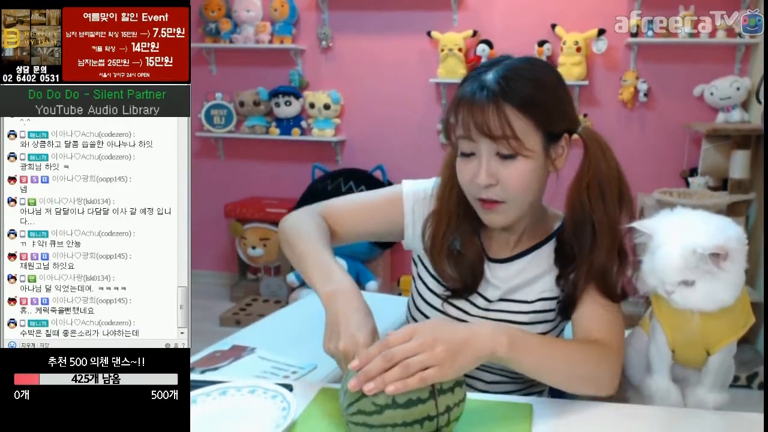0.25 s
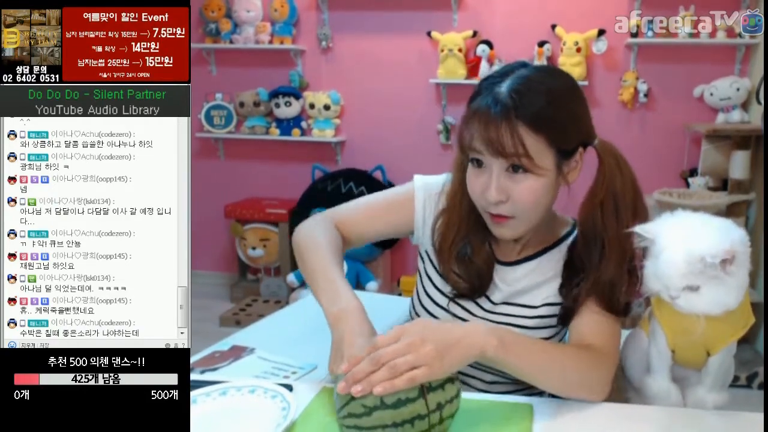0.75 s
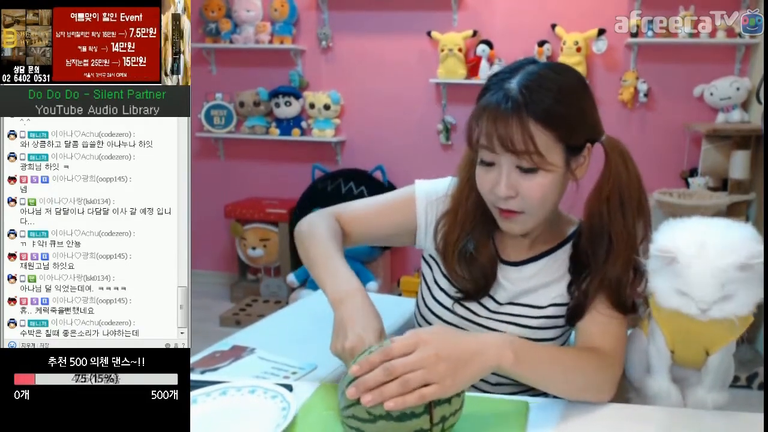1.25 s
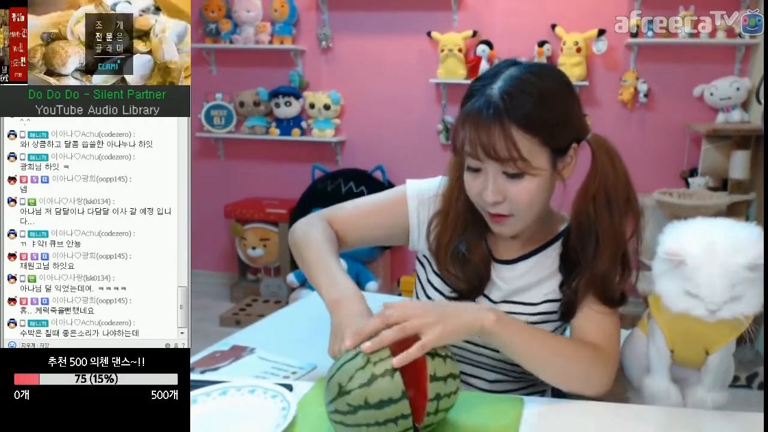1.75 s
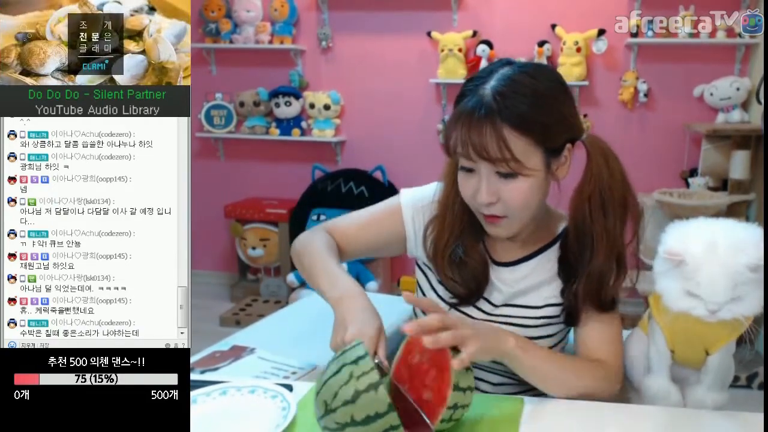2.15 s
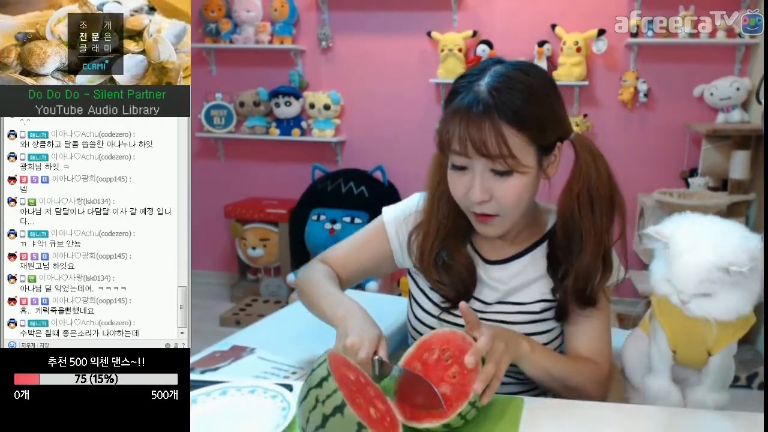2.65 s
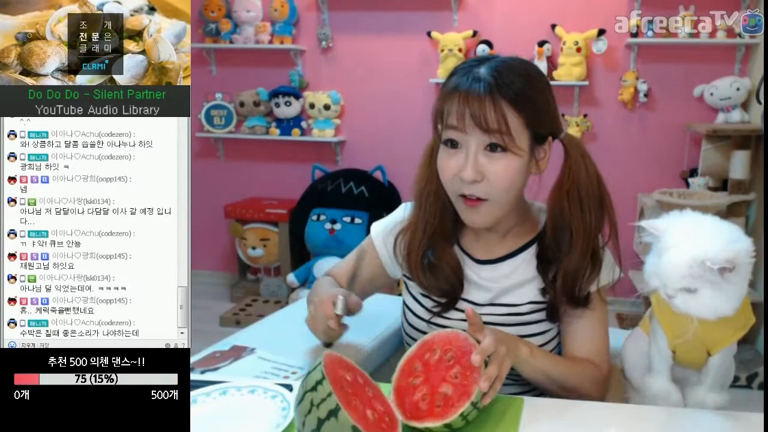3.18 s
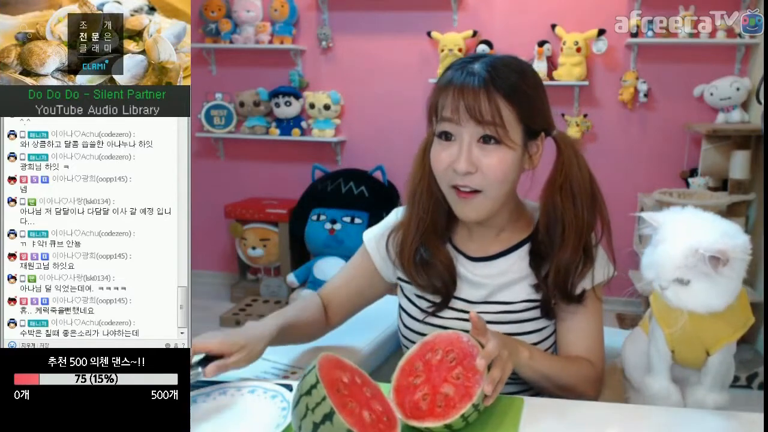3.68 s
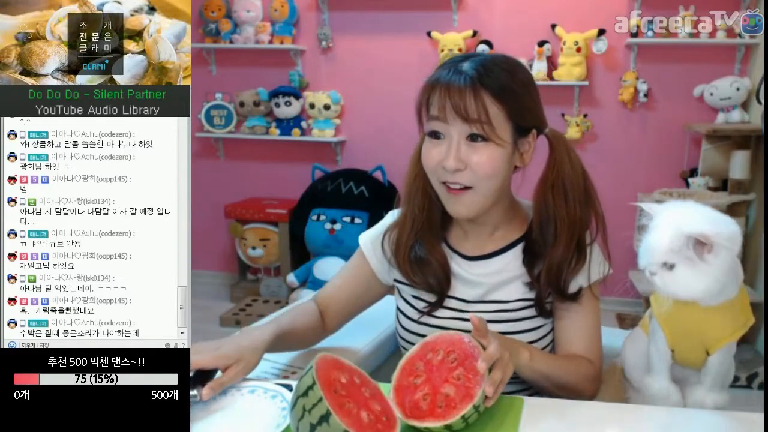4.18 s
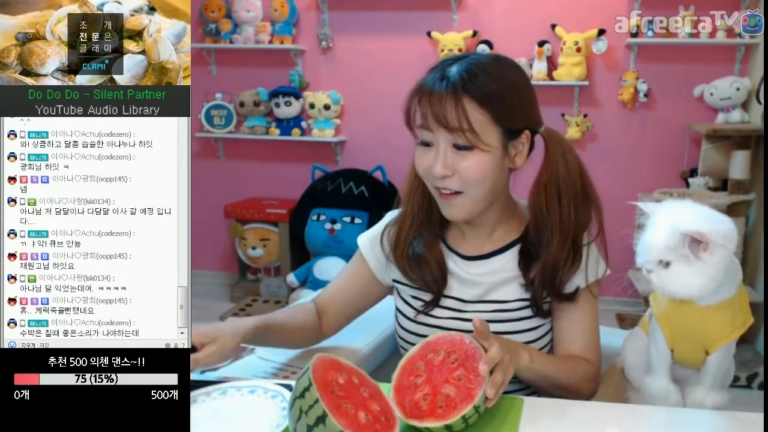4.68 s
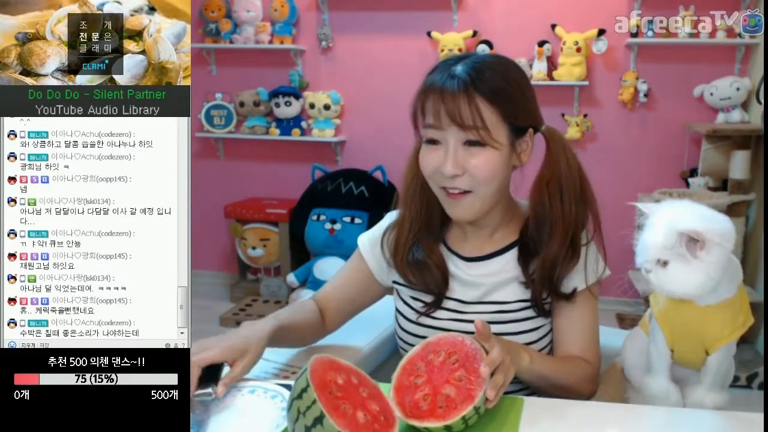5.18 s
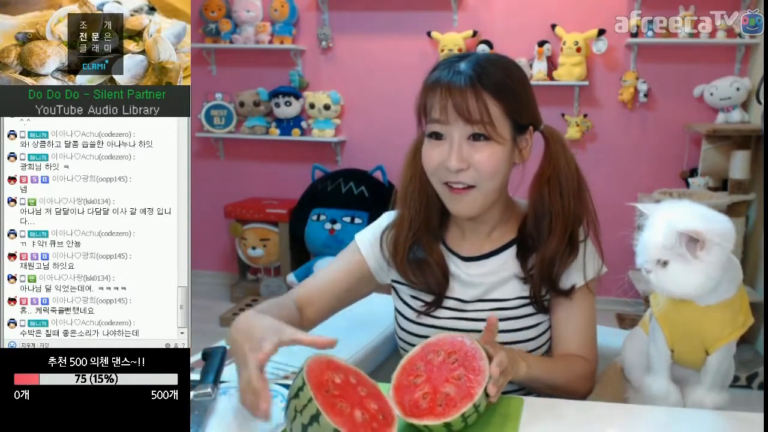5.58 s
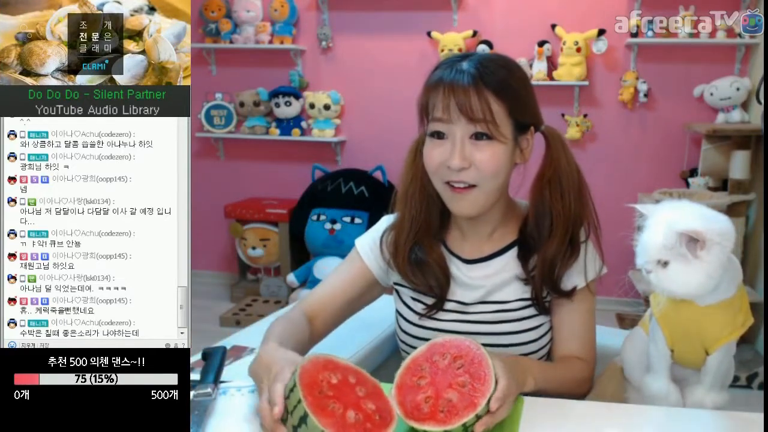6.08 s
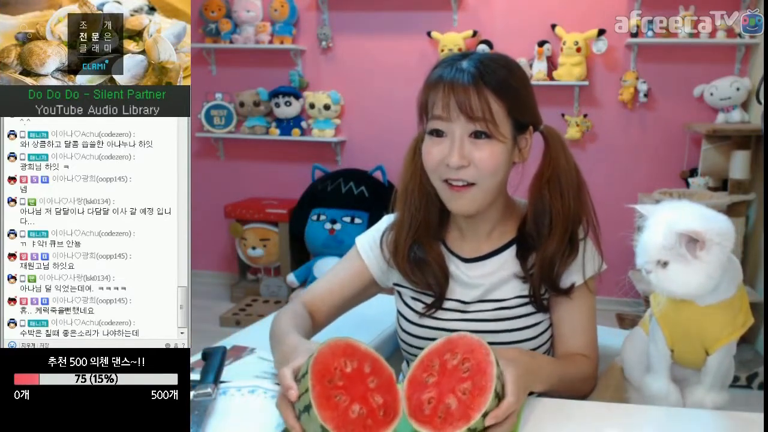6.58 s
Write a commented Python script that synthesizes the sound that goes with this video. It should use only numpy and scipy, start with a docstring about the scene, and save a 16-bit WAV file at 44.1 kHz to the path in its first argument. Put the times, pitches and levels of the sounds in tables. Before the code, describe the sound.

A knife cracks and crunches through a watermelon, knocks on the board, wet flesh tears apart, then a blade clatters brightly onto a dish indoors.

```python
"""Cutting a watermelon

A kitchen knife is pushed through a watermelon on a board in a small room, close to one microphone.
Rind and flesh crack as short clicks that shake the hollow melon; fibres tear as a dense crackle of tiny snaps.
The blade knocks on the board as bursts of fading noise; laid against a dish, it rings as a set of fading tones.
The handle bumps the table before the blade drops on the dish; last, the halves slide as soft noise.
Under it all the table booms and rumbles, and a fan hums in the air.
"""
import sys
import numpy as np
from scipy import signal
from scipy.fft import rfft, irfft
from scipy.io import wavfile
from scipy.ndimage import uniform_filter1d

SR = 44100
rng = np.random.default_rng(int(sys.argv[2]) if len(sys.argv) > 2 else 0)


def unload_audio(sound):
    """Save the sound as a 16-bit wav file, at the path given as the first command line argument."""
    columns = np.transpose(np.atleast_2d(sound))
    # keep every value between -1 and 1, then stretch to whole-number steps
    steps = np.round(np.clip(columns, -1, 1) * 32767)
    wavfile.write(sys.argv[1], SR, steps.astype(np.int16))


N = 301100
TIME = np.arange(N) / SR  # seconds

# Tone colour of the hollow, whole melon. Each row: frequency in Hz, relative level in dB.
MELON = [(30, -26), (130, -13), (230, -6), (310, -10), (380, 2), (480, 4), (590, -7), (800, -16),
         (1220, -10), (1700, -15), (2400, -14), (5000, -34)]


def from_db(db):
    """Turn decibels into a plain factor."""
    return 10 ** (np.asarray(db) / 20)


def rms_one(x):
    """Scale a sound to an average (rms) level of 1."""
    return x / np.sqrt(np.mean(x ** 2) + 1e-20)


def convolve(x, response):
    """Let every sample of x set off the response, kept to the scene's length."""
    return signal.fftconvolve(x, response)[:N]


def clicks(times, heights):
    """One-sample impulses at the given seconds."""
    samples = np.round(np.asarray(times) * SR).astype(int)
    return np.bincount(samples, heights, N)[:N]


def pulse(spectrum, size=4096):
    """The most abrupt causal pulse that has this spectrum (minimum phase); peak 1."""
    hz, db = np.transpose(spectrum)
    grid = np.maximum(np.fft.rfftfreq(size, 1 / SR), 1)
    grid_db = np.interp(np.log(grid), np.log(hz), db)
    cepstrum = irfft(np.log(from_db(grid_db)))
    cepstrum[0] = 0
    # doubling the first half of the cepstrum moves the energy as early as possible
    shape = irfft(np.exp(rfft(2 * cepstrum[:size // 2], size)))
    return shape / np.abs(shape).max()


def noise(spectrum):
    """Coloured noise of rms 1."""
    return rms_one(convolve(rng.standard_normal(N), pulse(spectrum)))


def ring(x, hz, t60):
    """A unit click sets a sine of height 1 ringing; it falls by 60 dB in t60 seconds."""
    radius = from_db(-60 / (t60 * SR))
    angle = 2 * np.pi * hz / SR
    return signal.lfilter([0, np.sin(angle)], [1, -2 * radius * np.cos(angle), radius ** 2], x + 1e-18)


def dying(t60):
    """One second of exponential decay, 60 dB in t60 seconds."""
    return from_db(-60 * TIME[:SR] / t60)


def colourless(response, size=140):
    """Even out the broad humps of a one-second response, so that it only spreads sound in time; unit energy."""
    power = np.abs(rfft(response, SR)) ** 2
    for _ in range(2):
        power = uniform_filter1d(power, size)  # size in Hz
    inverse_db = -10 * np.log10(power + 1e-9)
    inverse = pulse(np.column_stack([np.arange(len(power)) + 1, inverse_db]))
    even = signal.fftconvolve(response, inverse)[:SR]
    return even / np.linalg.norm(even)


def dense_ring(t60):
    """Countless overlapping modes: noise that dies away; unit energy."""
    return colourless(rng.standard_normal(SR) * dying(t60))


def softened(x, hard_hz):
    """A softer contact loses its treble, above a lower cutoff."""
    return signal.sosfilt(signal.butter(1, min(hard_hz, .45 * SR), fs=SR, output="sos"), x)


def struck(modes, s, db, hard_hz):
    """Blows set separate tones ringing; harder contacts wake the higher ones."""
    total = np.zeros(N)
    for hz, mode_db, t60 in modes:
        heights = from_db(db + mode_db) / np.hypot(1, hz / hard_hz)
        total += ring(clicks(s, heights), hz, t60) * rng.choice([-1, 1])
    return total


def efforts(rows, attack_db_per_s, release_db_per_s):
    """Level in dB over time: each effort sets in, changes steadily to its final level, then lets go."""
    levels = []
    for s, length, db, build_db in rows:
        build = build_db * np.clip(1 - (TIME - s) / length, 0, 1)
        attack = attack_db_per_s * np.maximum(s - TIME, 0)
        release = release_db_per_s * np.maximum(TIME - s - length, 0)
        levels.append(db - build - attack - release)
    return np.max(levels, axis=0)


def room(x, wet_db, build_s=.009):
    """Direct sound, three close reflections and a diffuse tail that builds up and dies band by band."""
    # Reflections from board, table and nearby things. Each row: delay in seconds, level in dB.
    echoes = [(.0014, -9), (.0036, -16), (.0087, -13)]
    # The tail of the room. Each row: frequency in Hz, relative level in dB, time to fall 60 dB in seconds.
    tail_bands = [(100.3, 0, 0.459), (396, -4.5, 0.32), (1190, 6.5, .32), (3486, 3, 0.3), (7050, 0, 0.34),
                  (10100, 6.5, .25)]
    delays, echo_db = np.transpose(echoes)
    near = clicks(np.append(0, delays), np.append(1, from_db(echo_db)))[:SR]
    hz, db, t60 = np.transpose(tail_bands)
    white = rfft(rng.standard_normal(SR))
    grid = np.log(np.arange(SR // 2 + 1) + 1)
    tail = np.zeros(SR)
    for share, band_db, band_t60 in zip(np.eye(len(hz)), db, t60):
        # each band fades over into its neighbours
        band = irfft(white * np.interp(grid, np.log(hz), share), SR)
        tail += band * from_db(band_db) * dying(band_t60)
    tail *= 1 - np.exp(-(TIME[:SR] / build_s) ** 2)
    return convolve(x, colourless(near + from_db(wet_db) * tail / np.linalg.norm(tail)))


def room_tone():
    """Steady air noise with the soft resonances of a fan, which are noise through narrow filters."""
    # Colour of the air noise. Each row: frequency in Hz, relative level in dB.
    air_colour = [(15, -53), (25, -19.5), (65, -2), (118, -2), (141, -13.5), (168, -7), (375, -8.5),
                  (404, -21.5), (447, -15.5), (737, -21), (857, -12.5), (924, -26.5), (996, -11.5),
                  (2580, -24.5), (10000, -39), (13000, -61.5), (22000, -120)]
    # Fan resonances. Each row: frequency in Hz, width in Hz, level in dB.
    fan_hums = [(79.4, 16, -73), (438.2, 34, -74.5), (842, 80, -73), (969, 19, -82.5)]
    fan = np.zeros(N)
    for hz, width, db in fan_hums:
        t60 = np.log(1000) / (np.pi * width)  # a wide resonance dies sooner
        fan += from_db(db) * rms_one(ring(rng.standard_normal(N), hz, t60))
    return from_db(-65) * noise(air_colour) + fan


def sway():
    """Leaning on the knife slowly rocks the table and the microphone on it."""
    # Each row: start in seconds, level in dB before the low-pass filter.
    leans = [(0, -41.5), (0.639, -40.5), (1.721, -55)]
    s, db = np.transpose(leans)
    rocking = ring(clicks(s, from_db(db)), hz=17, t60=1.1)
    return signal.sosfilt(signal.butter(2, 35, fs=SR, output="sos"), rocking)


def table():
    """The table top booms under each shove and rumbles as the melon rocks."""
    # Shoves that set the table booming. Each row: time in seconds, level in dB before the mode's own level.
    shoves = [(0.569, -47), (0.637, -49.5), (0.904, -51), (.955, -46), (1.026, -41.5), (1.354, -54.5),
              (5.349, -42), (5.552, -60)]
    # Table tones. Each row: frequency in Hz, relative level in dB, time to fall 60 dB in seconds.
    table_modes = [(62.6, -2, 0.4), (87.3, -2, 0.36), (124, -5, 0.21), (172, 0.5, .14), (222, -5, 0.24)]
    # The melon rocks and rubs on the board.
    # Each row: start in seconds, length in seconds, final level in dB, build-up in dB.
    rocks = [(.54, 0.042, -58, 0), (.72, 0.24, -51.5, 14), (.96, 0.054, -52.5, 5), (1.38, .1, -60.5, 3),
             (1.72, 0.33, -69, 3), (2.25, 0.29, -69, 2), (5.55, 0.059, -60, 4)]
    # Colour of the rumble. Each row: frequency in Hz, relative level in dB.
    rumble_colour = [(20, -15), (45, -11.5), (90, -2), (200, -2.5), (300, -8), (450, -7), (700, -12.5),
                     (1400, -16.5), (4000, -42)]
    holding_db = -77  # faint rumble of hands and arms on the table
    s, db = np.transpose(shoves)
    boom = sum(ring(clicks(s, from_db(db + mode_db)), hz, t60) for hz, mode_db, t60 in table_modes)
    boom = signal.sosfilt(signal.butter(4, 62, "high", fs=SR, output="sos"), boom)
    rocking = from_db(efforts(rocks, attack_db_per_s=301, release_db_per_s=138))
    return boom + np.hypot(rocking, from_db(holding_db)) * noise(rumble_colour)


def sliding():
    """Wet rind hisses softly over the board: noise that swells with each slide."""
    # Each row: start in seconds, length in seconds, final level in dB, build-up in dB.
    slides = [(5.9, 0.13, -76, 8), (6.27, .15, -67, 12), (6.75, .07, -76.5, 5)]
    # Colour of the hiss. Each row: frequency in Hz, relative level in dB.
    slide_colour = [(500, -13), (1300, -2.5), (2500, -1), (5300, -0.5), (7000, -7.5), (10000, -22)]
    level_db = efforts(slides, attack_db_per_s=101, release_db_per_s=47)
    return from_db(level_db) * noise(slide_colour)


def handle():
    """The handle bumps the table: a short woody thud, with a faint ring of the steel after it."""
    # The bump: time in seconds, level in dB before the gains of thud and ring.
    bump = (4.6368, -34.5)
    # Colour of the thud. Each row: frequency in Hz, relative level in dB.
    bump_colour = [(100, -15), (400, -8), (700, -5), (1700, -7), (2500, -9), (3500, -19.5), (5000, -16.5),
                   (7000, -23), (10000, -31.5)]
    # Tones of the handle. Each row: frequency in Hz, relative level in dB, time to fall 60 dB in seconds.
    handle_modes = [(493, -13, .05), (688, -8.5, 0.11), (890, -23, 0.049), (1040, -5, 0.045),
                    (1730, -7.5, 0.036), (2430, -12, 0.051), (4740, -24, 0.36)]
    s, db = bump
    hit = clicks([s], [from_db(db)])
    thud = convolve(convolve(hit, pulse(bump_colour)), dense_ring(t60=.05))
    steel_ring = sum(from_db(mode_db) * ring(hit, hz, t60) for hz, mode_db, t60 in handle_modes)
    return from_db(9.5) * thud + from_db(-3.5) * steel_ring


def knife():
    """The blade touches lightly three times, then drops on the dish and bounces; tones ring and contacts tick."""
    # Each row: time in seconds, then levels in dB (before their gains below) of blade ring, dish ring
    # and contact tick, and hardness as a treble cutoff in Hz.
    clinks = [(4.0378, -61.5, -90.5, -61, 9100), (4.4098, -41.5, -62, -40.5, 1600),
              (5.2912, -55.5, -79.5, -64, 12100), (5.3474, -41, -18.5, -10, 12000),
              (5.3560, -48, -25.5, -18.5, 4955), (5.3600, -42.5, -23, -17, 12000),
              (5.3665, -44.5, -33, -15, 9000)]
    # Tones of the steel blade. Each row: frequency in Hz, relative level in dB, time to fall 60 dB in seconds.
    blade_modes = [(797, -2, .16), (1040, -10, .1), (1448, -9, .1), (1700, -11, .08), (2207, -3, .18),
                   (2304, -5, .12), (3110, -5, .12), (3381, -9, .12), (4240, -4, .13), (5599, -10, .12),
                   (7080, -10, .11)]
    # Tones of the dish. Each row: frequency in Hz, relative level in dB, time to fall 60 dB in seconds.
    dish_modes = [(1360, -17, .08), (1995, -5.5, .09), (2126, -13, .12), (3626, -9, .13), (3912, -12, .1),
                  (4479, -18, .14), (5399, -16, .14), (5771, -15, .12), (6045, -10, .1), (6208, -11, .12),
                  (6364, -13, .14), (6938, -7, .13), (7035, -3, .17), (7109, -6, .13), (7239, -6, .14),
                  (7346, -11, .12), (7647, -10, .14), (7848, -9, .15), (8350, -9, .16), (8773, -12, .14)]
    # Colour of the contact ticks. Each row: frequency in Hz, relative level in dB.
    tick_colour = [(30, -41), (150, -21.5), (500, -27.5), (900, -16), (1400, -8), (2100, -4), (2700, -11.5),
                   (3500, 1.5), (5000, -3.5), (6100, -4.5), (6600, -2), (7200, 4.5), (8300, -6),
                   (9200, -7.5), (10000, -16.5)]
    s, blade_db, dish_db, tick_db, hard_hz = np.transpose(clinks)
    blade = from_db(-4) * struck(blade_modes, s, blade_db, hard_hz)
    dish = from_db(-5) * struck(dish_modes, s, dish_db, hard_hz)
    clatter = np.zeros(N)
    for at, db, hz in zip(s, tick_db, hard_hz):
        # the contact buzzes for an instant and leaves many weak modes ringing
        buzz = from_db(6) * dense_ring(t60=.01) + from_db(3.5) * dense_ring(t60=.13)
        clatter += convolve(clicks([at], [from_db(db)]), softened(buzz, hz))
    return blade + dish + convolve(clatter, pulse(tick_colour))


def knocks():
    """The blade comes down on the board: a dull blow, a short, duller rattle, and one echo from the wall."""
    # Each row: time in seconds, blow level in dB (before a 4 dB boost), rattle level in dB,
    # hardness as a treble cutoff in Hz.
    knock_rows = [(1.0262, -12, -3, 6500), (1.355, -23, -12.5, 2220)]
    # Colour of the board. Each row: frequency in Hz, relative level in dB.
    board_colour = [(30, -16), (100, -6), (280, -10), (410, 4), (600, -5), (800, -3), (1100, 0), (1450, -6),
                    (1850, -3), (2800, -9), (4300, -7), (6000, -19), (10000, -34)]
    wall_s, wall_db = .0233, -15  # echo from the nearest wall: delay in seconds, level in dB
    out = np.zeros(N)
    for s, blow_db, rattle_db, hard_hz in knock_rows:
        rattle = from_db(rattle_db) * softened(dense_ring(t60=.05), 2580)
        blow = from_db(blow_db + 4) * dense_ring(t60=.014)
        hits = clicks([s, s + wall_s], [1, from_db(wall_db)])
        out += convolve(hits, softened(blow + rattle, hard_hz))
    return convolve(out, pulse(board_colour))


def snaps(x):
    """Fractures sound coarse in the rind and brighter in the flesh."""
    # Where the break runs. Each row: time in seconds, share of rind from 0 to 1.
    rind_share = [(0, 0.14), (.55, 0.89), (.65, 1), (.85, 0.32), (1.8, 0.7), (2.3, 0.03), (6.83, 0.06)]
    # Colour of a snap in the hard rind. Each row: frequency in Hz, relative level in dB.
    rind_colour = [(200, -25), (900, -13.5), (1900, -10), (2600, -5), (3300, -2), (4300, 0), (5500, 0.5),
                   (6500, -6.5), (8000, -6.5), (9500, -14.5), (11000, -27.5)]
    # Colour of a snap in the wet flesh. Each row: frequency in Hz, relative level in dB.
    flesh_colour = [(200, -33), (900, -19.5), (1900, -24), (2800, -12), (4000, -2.5), (5400, 0.5),
                    (6500, -4), (7700, -1), (9500, -11), (11000, -28)]
    share = np.clip(np.interp(TIME, *np.transpose(rind_share)), 0, 1)
    return convolve(x * share, pulse(rind_colour)) + convolve(x * (1 - share), pulse(flesh_colour))


def tearing_level():
    """Level in dB of the tearing fibres, and of the juice that goes on crackling after the last tear."""
    # Each push of the knife or pull of the hands tears fibres; most grow louder until they give.
    # Each row: start in seconds, length in seconds, final level in dB (before a later trim), build-up in dB.
    tears = [(0, .4, -63, 8), (.415, 0.051, -33.5, 13), (.545, 0.064, -24.5, 15.5), (.66, .33, -47, 5),
             (1.42, 0.14, -61, 7), (1.782, .072, -48.5, 3.5), (1.955, .022, -45.5, 15),
             (2.12, 0.075, -63.5, 5), (2.29, 0.13, -41.5, 11), (2.47, 0.041, -46.5, -2)]
    juice_db, juice_fade_db_per_s = -60, 35  # level before the same trim
    since = TIME - tears[-1][0]  # seconds since the last tear began
    juice = np.where(since > 0, juice_db - juice_fade_db_per_s * since, -np.inf)
    return np.maximum(efforts(tears, attack_db_per_s=1500.5, release_db_per_s=600.5), juice)


def tearing(tear_db, per_s, spread_db, body_db):
    """Cell walls burst by the thousand: tiny snaps of very uneven size, which also shake the melon a little."""
    unevenness = np.minimum(rng.exponential(1, N), 2.6)
    sizes = from_db(spread_db * unevenness) * rng.choice([-1, 1], N)
    grains = sizes * (rng.random(N) < per_s / SR)
    body = rms_one(convolve(grains, pulse(MELON)))
    crackle = rms_one(snaps(grains)) + from_db(body_db) * body
    return from_db(tear_db - 8) * crackle


def small_cracks(tear_db):
    """Lesser fractures at uneven intervals while fibres tear, stronger with the tearing; rows as for loud cracks."""
    per_s, threshold_db = 32, -66  # chances per second; tearing level a crack needs
    snap_base_db, growth = -51.5, 0.65  # snap at the threshold; dB per dB of tearing above it
    spread_db, body_db = 3.5, -15.5  # random spread either way; melon body relative to the snap
    count = int(per_s * N / SR)
    chance = rng.random((count, 2))
    s = (np.arange(count) + chance[:, 0]) / per_s
    strain_db = np.interp(s, TIME, tear_db) - threshold_db
    snap_db = snap_base_db + growth * strain_db + spread_db * (2 * chance[:, 1] - 1)
    return np.column_stack([s, snap_db, snap_db + body_db])[strain_db > 0]


def cracks(rows, run_s=.0009, branch_db=-11, count=5):
    """Each fracture is a snap with a few branches; it shakes the heavy melon, which sounds higher once it is open."""
    # Tone colour of the melon once it gapes. Each row: frequency in Hz, relative level in dB.
    halves_colour = [(30, -20), (140, -2), (300, -1), (450, 2), (590, 6.5), (780, -4.5), (1000, 1.5),
                     (1250, 4.5), (1600, -8), (2400, 0.5), (5000, -31)]
    split_s = 1.7  # the melon gapes from here on
    s, snap_db, body_db = np.transpose(rows)
    # branches follow within run_s seconds, pushing in or out at random
    late = rng.uniform(0, run_s, (len(s), count))
    sign = rng.choice([-1, 1], (len(s), count))
    branch_heights = sign * from_db(snap_db + branch_db)[:, None]
    branches = clicks((s[:, None] + late).ravel(), branch_heights.ravel())
    shakes = clicks(s, from_db(body_db))
    whole = convolve(shakes * (TIME < split_s), pulse(MELON))
    gaping = convolve(shakes * (TIME >= split_s), pulse(halves_colour))
    whole_body = from_db(4) * convolve(whole, dense_ring(t60=0.053))
    gaping_body = from_db(8) * convolve(gaping, dense_ring(t60=0.023))
    return from_db(0.7) * snaps(clicks(s, from_db(snap_db)) + branches) + whole_body + gaping_body


def scene():
    """Everything reaches a single microphone, heard alike on both channels."""
    # The loud cracks of rind and flesh. Each row: time in seconds, then levels in dB (before the gains
    # in cracks) of the snap and of the hollow melon body.
    loud_cracks = [(.406, -23, -37.5), (.4231, -28, -41.5), (.435, -22.5, -40), (.4545, -27.5, -40),
                   (.4662, -22, -36.5), (.5563, -22, -30), (.5717, -12.5, -23.5), (.591, -18.5, -28),
                   (.6012, -15.5, -29), (.6053, -15, -29.5), (.8473, -12.5, -37.5), (.9105, -18.5, -37),
                   (1.7834, -47, -50), (1.836, -32.5, -62), (1.8552, -23, -63), (1.9785, -33.5, -66),
                   (2.2861, -20, -35.5), (2.3255, -21.5, -38.5), (2.3585, -22, -40.5), (2.3847, -16.5, -35),
                   (2.4739, -24.5, -42.5), (2.5424, -36, -50)]
    tear_db = tearing_level()
    fibres = tearing(tear_db, per_s=2200, spread_db=3.5, body_db=-13.5)
    melon = room(cracks(loud_cracks) + cracks(small_cracks(tear_db)) + fibres, wet_db=-8.5)
    board = room(knocks() + handle(), wet_db=-7)
    steel = room(knife(), wet_db=-6.5)
    mono = melon + board + steel + table() + sway() + sliding() + room_tone()
    return np.array([mono, mono])


def record(dry):
    """The treble is cut steeply above 10 kHz."""
    return signal.sosfilt(signal.ellip(10, .3, 70, 10000, fs=SR, output="sos"), dry)


dry = scene()
out = record(dry)
unload_audio(out)
```